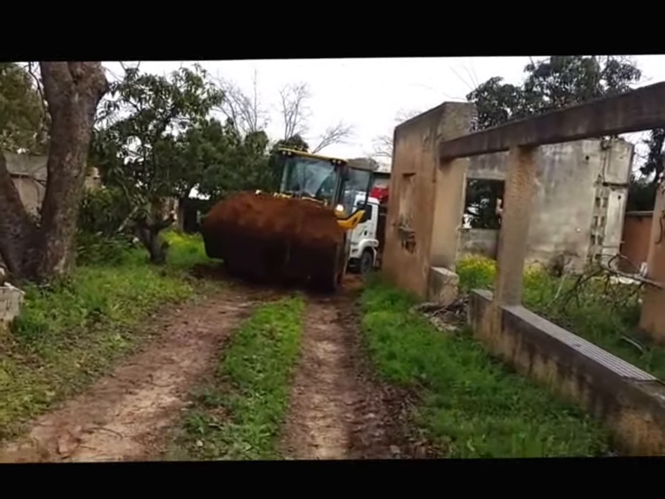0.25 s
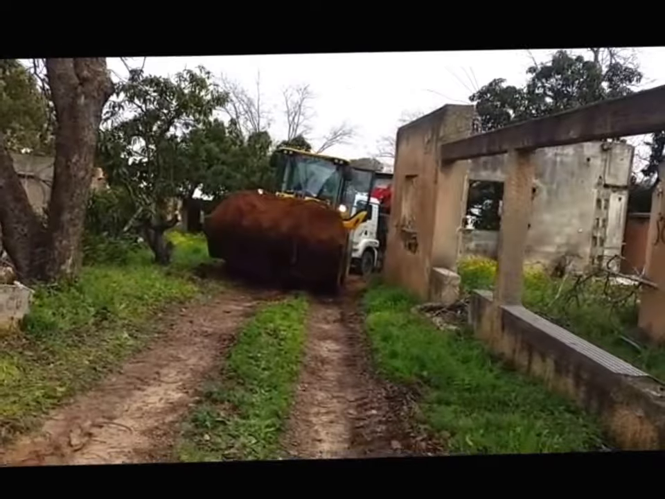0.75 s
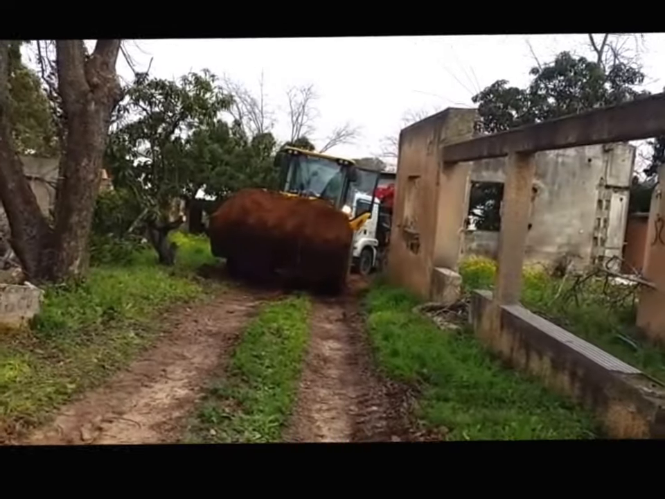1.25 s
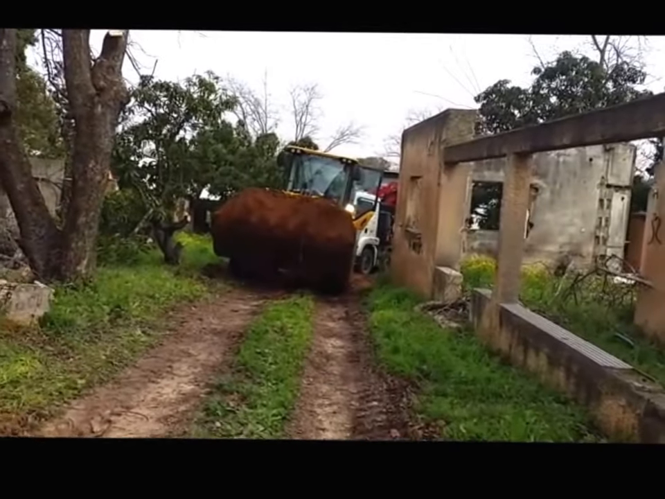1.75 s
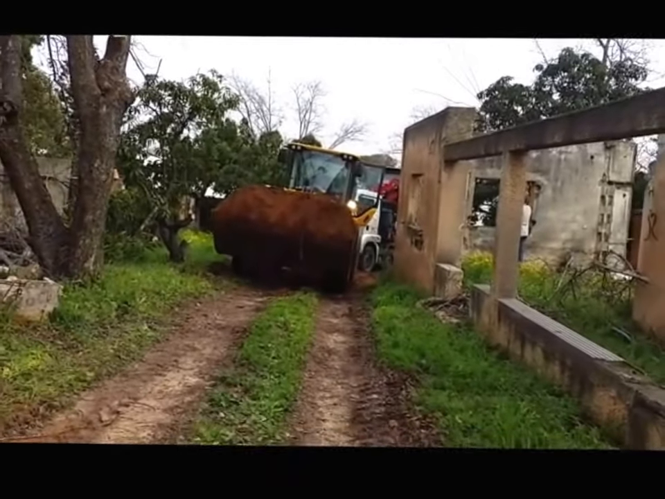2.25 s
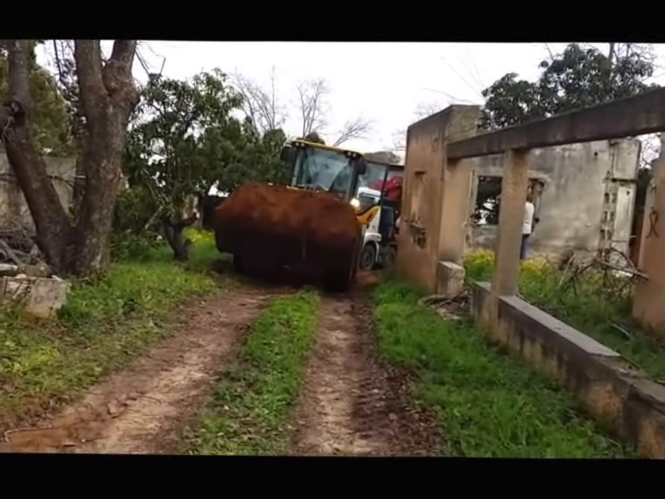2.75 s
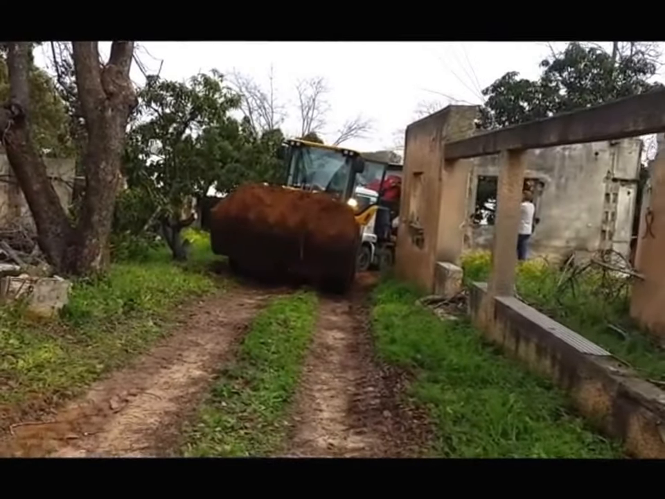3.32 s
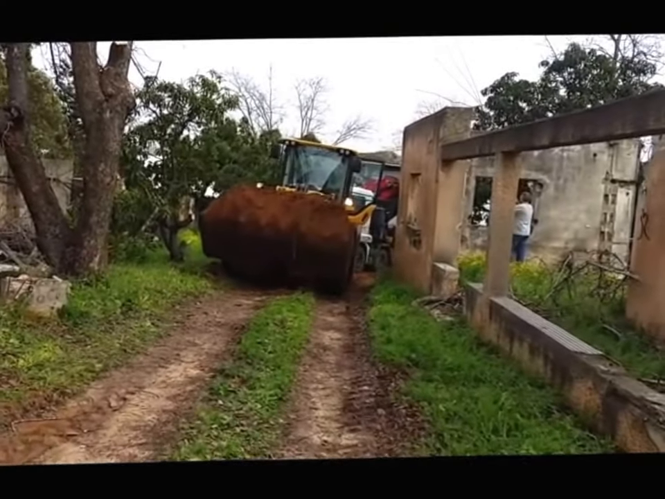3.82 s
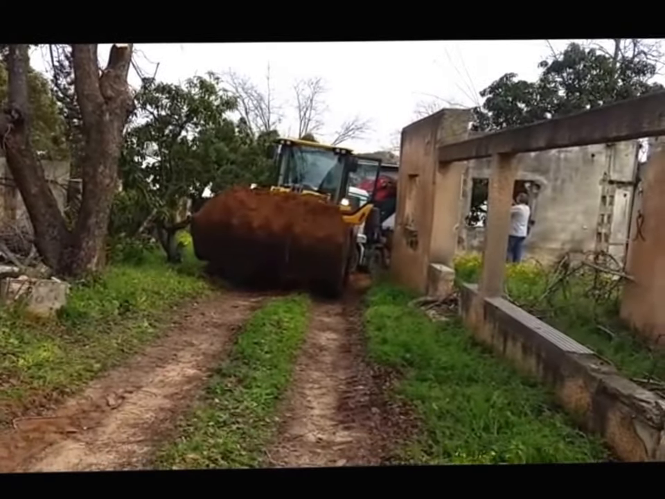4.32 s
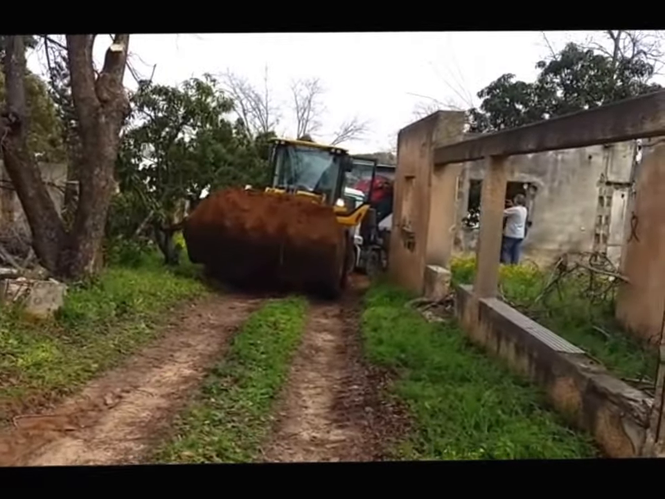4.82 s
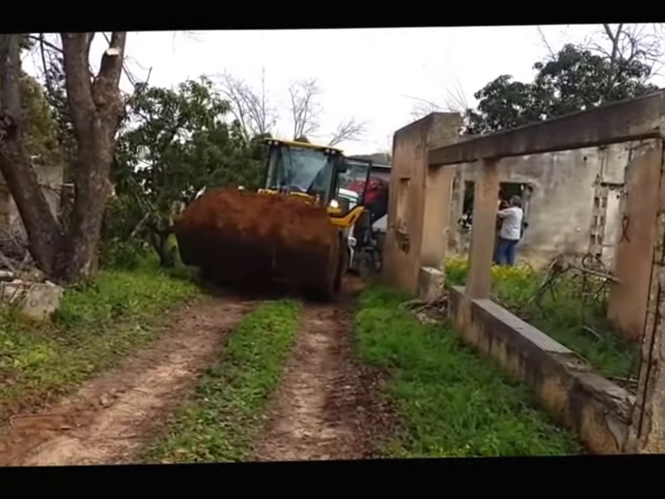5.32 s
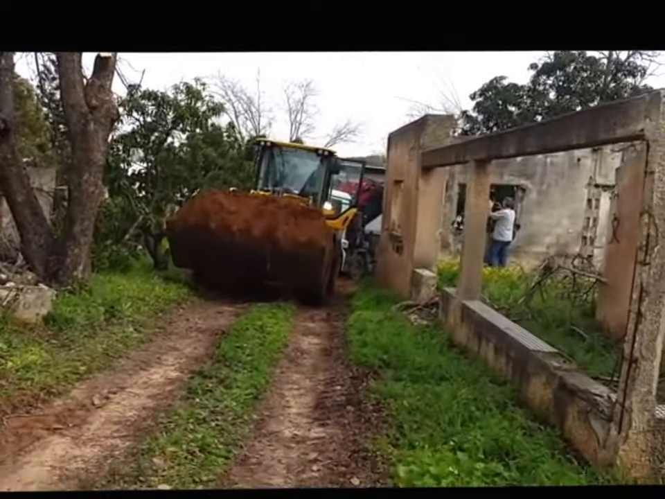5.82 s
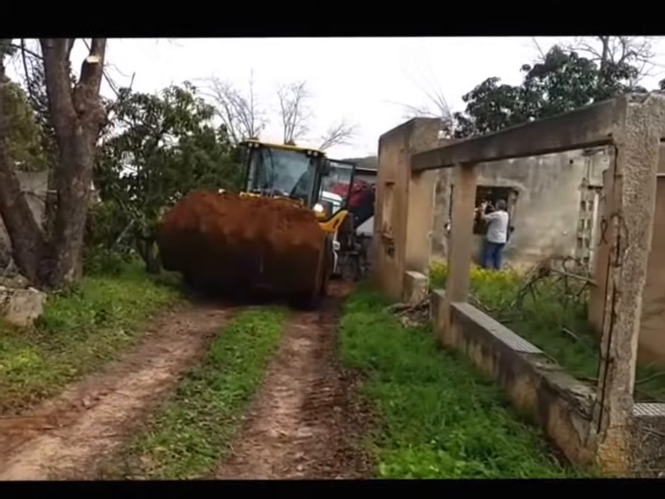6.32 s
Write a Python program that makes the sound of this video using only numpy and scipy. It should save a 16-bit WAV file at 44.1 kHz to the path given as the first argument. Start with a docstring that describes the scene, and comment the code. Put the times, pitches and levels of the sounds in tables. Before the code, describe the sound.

A diesel wheel loader crawls along a dirt track toward a handheld microphone, its exhaust droning and its engine roar throbbing steadily louder. A hydraulic pump and gears whine in swells, while a second, slower engine rises and falls low behind it. Near the end the loader revs up and a high hiss of cooling air grows. Close by, grass rustles faintly underfoot and a few stems snap.

```python
"""A dirt track through grass, on a handheld two-port microphone. A six-cylinder diesel loader crawls in
from about 32 m to 11 m and revs up near the end: its exhaust drones, its hydraulic pump and gears sing,
and its firings throb in the roar and ring the bonnet panels. Behind it a second, slower engine hunts
up and down. Close to the microphone, grass rustles underfoot and a few stems snap."""
import sys
import numpy as np
from scipy import signal
from scipy.fft import rfft, irfft
from scipy.io import wavfile
from scipy.ndimage import uniform_filter1d

SR = 44100
rng = np.random.default_rng(int(sys.argv[2]) if len(sys.argv) > 2 else 0)


def wav_record(signal):
    """Record a signal, one row per channel, as 16-bit PCM in the file named by sys.argv[1]."""
    frames = np.transpose(np.atleast_2d(signal))
    bounded = np.clip(frames, -1, 1)
    # unit amplitude maps onto the largest positive 16-bit level
    quanta = np.round(bounded * 32767).astype(np.int16)
    wavfile.write(sys.argv[1], SR, quanta)


N = 289296
MIDDLE_M = 16  # reference distance of the loader


def loader():
    """The machine on the track; its roar and weaker tones grow as it nears and as it revs."""
    # engine speed: t/s, cycle f/Hz (six firings a cycle)
    speed = [(0, 15.24), (1.45, 15.17), (1.8, 14.97), (2.5, 14.8), (4.3, 14.72), (4.55, 14.84),
             (5.22, 15.82), (5.5, 16.57), (6, 16.48), (6.55, 16.19)]
    idle_hz, throttle_db_per_hz = 14.59, 1.07
    hz = over_time(speed)[0]
    cycles = np.cumsum(hz) / SR
    gain_db = 20 * np.log10(MIDDLE_M / metres()) + throttle_db_per_hz * (hz - idle_hz)
    return (cooling_air() + exhaust(cycles, gain_db) + pump(cycles) + gears(cycles, gain_db)
            + turbo() + amp(gain_db) * roar(cycles) + panels(cycles))


def exhaust(cycles, gain_db):
    """Orders of the engine cycle start as one suction pulse; the pipe spreads them a little in time."""
    # strong orders at the microphone, swelling and fading: {order: (t/s, level/dB)}
    strong_orders = {6: [(0, -35), (.3, -34), (1.7, -34.5), (2.2, -37), (3.6, -35), (4.3, -29), (4.75, -24),
                     (5, -33.5), (5.5, -28), (6, -22), (6.55, -25)], 9: [(0, -28.5), (.3, -32),
                     (1.5, -31.5), (1.8, -43), (2.25, -42), (2.7, -31.5), (3, -39), (3.5, -30.5),
                     (4.5, -26), (4.75, -37), (5, -27), (5.28, -28), (5.5, -37), (5.75, -31), (6.1, -41),
                     (6.55, -56)], 10: [(0, -50), (1.3, -41), (2.45, -50), (2.75, -44), (3.1, -37.5),
                     (3.75, -39), (4, -49), (4.75, -38), (5.25, -39.5), (5.6, -31), (6.3, -31.5),
                     (6.55, -39.5)], 12: [(0, -41.5), (1.6, -38.5), (3.75, -33.5), (4, -40.5), (4.4, -35.5),
                     (5, -41), (5.25, -31), (5.5, -40.5), (6.55, -39)]}
    # weak orders from unequal cylinders: order, level/dB before the swell
    weak_orders = [(7, -45), (8, -48), (11, -49), (13, -51), (14, -49), (15, -53), (16, -57), (17, -62),
                   (18, -56), (19, -62), (20, -64), (21, -67), (22, -66), (24, -66), (26, -64), (36, -57),
                   (40, -60), (41, -56), (42, -63), (45, -62)]

    def start_turn(order):
        return .5 - .01 * (order - 9) ** 2
    strong_db = {order: over_time(curve)[0] for order, curve in strong_orders.items()}
    out = sum(tone(cycles, order, db, waver_db=.5, slip=.1, start=start_turn(order))
              for order, db in strong_db.items())
    # orders 8 and 14 come from crank unbalance and swell with order 10
    crank_db = .7 * (strong_db[10] + 43)
    for order, db in weak_orders:
        swell_db = crank_db if order in (8, 14) else gain_db
        start = start_turn(order) + .3 * rng.standard_normal()
        out += tone(cycles, order, db + swell_db, waver_db=1.4, slip=.5, start=start)
    return out


def roar(cycles):
    """Combustion roar at the middle distance, throbbing with each firing and each cycle."""
    # spectrum of the roar: f/Hz, relative level/dB
    colour = [(15, -30), (30, -16), (50, -15), (85, -8), (170, -7), (230, -14), (321, -23), (438, -27),
              (543, -16), (875, -28), (1280, -27), (1480, -31), (2270, -32), (2690, -39), (4650, -43),
              (6050, -60), (7500, -72), (9750, -102)]
    # valves and injectors clatter alike in every cycle; the rest never repeats
    steps = 3000
    clatter = rng.standard_normal((2, steps))[:, (cycles * steps).astype(int) % steps]
    angle = 2 * np.pi * cycles
    throb = amp(.18 * np.cos(6 * angle) + .23 * np.cos(angle) + .46 * walk(6.01))
    noise = rng.standard_normal((2, N)) + .31 * clatter
    return amp(-48.5) * at_ports(throb * noise, colour, lo_hz=848, hi_hz=5000)


def pump(cycles):
    """The hydraulic pump turns with the engine and sings louder while the hydraulics work."""
    # pump tone at the microphone: t/s, level/dB
    level = [(0, -53), (.72, -57.5), (1.0, -42.5), (1.2, -38.5), (1.5, -39), (1.8, -42), (2.2, -48.5),
             (2.7, -61), (3.08, -53), (3.25, -42.5), (3.4, -39.5), (3.6, -44.5), (4.08, -41), (4.4, -43.5),
             (4.6, -49.5), (4.75, -43), (4.95, -58), (5.08, -58), (5.27, -42), (5.38, -40), (5.55, -56),
             (5.82, -55), (6.1, -43), (6.4, -39.5), (6.55, -37.5)]
    return tone(cycles, order=35.47, db=over_time(level)[0], waver_db=.6, slip=.1)


def gears(cycles, gain_db):
    """A fast mesh rasps under load, others whine by turns, and one geared shaft hums throughout."""
    # rasp at the microphone: t/s, level/dB
    rasp = [(0, -71), (4.3, -67), (4.75, -60), (5.1, -60), (5.35, -55.5), (5.55, -60), (5.8, -53),
            (6.0, -62), (6.3, -57), (6.55, -59)]
    # gear whines: order of the engine cycle, start t/s, end t/s, level/dB
    whines = [(53, 0.26, 1.82, -56.5), (38.3, 1.85, 2.4, -50), (38.08, 2.7, 4.5, -55),
              (87.9, 1.6, 1.96, -55.5), (88, 2.28, 3.6, -58), (70.6, 0.38, 2.4, -65.5),
              (70.3, 2.9, 4.33, -57), (52.9, 2.9, 4.2, -57), (84.5, .2, 1.2, -63.5), (47.1, 2.9, 4.3, -54),
              (47.1, 4.4, 5.2, -50), (41.3, 4.55, 4.8, -52), (31.65, 5.1, 5.53, -49.5),
              (46.5, 5.7, 7.1, -53.5)]
    rasp_backlash, whine_backlash = .0012, .001  # in engine cycles
    rasp_db = over_time(rasp)[0] + 2.5 * walk(25)
    out = tone(cycles + rasp_backlash * walk(60), order=138.3, db=rasp_db, waver_db=1, slip=1)
    for order, start, end, db in whines:
        whine = tone(cycles + whine_backlash * walk(30), order, db, waver_db=1.5, slip=.45)
        out += held(start, end, rise_s=.24, fall_s=.24) * whine
    return out + tone(cycles, order=17.73, db=gain_db - 53.5, waver_db=2.5, slip=.5)


def panels(cycles):
    """Each firing shakes the bonnet panels, which ring in narrow bands that swell and fade."""
    # panel resonances: f/Hz, width/Hz, level/dB at the middle distance, loss with distance/(dB/m)
    resonances = [(1078, 32, -64, 0), (1275, 47, -64.5, -0.5), (1184, 100, -63.5, -0.4),
                  (2313, 200, -61, 0), (1577, 63, -69, .5), (3810, 560, -67, 0.23)]
    shake = amp(3 * (np.cos(2 * np.pi * 6 * cycles) + walk(20) / 2))
    out = 0
    for hz, width, db, loss in resonances:
        ring = [(20, -90), (hz - 2 * width, -30), (hz - width / 2, -3), (hz, 0),
                (hz + width / 2, -3), (hz + 2 * width, -30), (20000, -90)]
        swell = amp(db - loss * (metres() - MIDDLE_M) + 1.3 * walk(4))
        out += swell * at_ports(shake * rng.standard_normal((2, N)), ring, lo_hz=20, hi_hz=20000)
    return out


def cooling_air():
    """The loader's cooling air, a high hiss that grows as it comes closer."""
    # spectrum of the hiss: f/Hz, relative level/dB
    colour = [(3060, -31), (5200, -24), (5790, -16), (7680, -17.5), (9170, -3.5), (10800, -6), (15800, 1.5)]
    # top band of the hiss at the microphone: t/s, level/dB
    level = [(0, -67.5), (.5, -65), (1.2, -64.5), (1.6, -64), (1.9, -63.5), (2.5, -63), (2.9, -61.5),
             (3.3, -62.5), (3.9, -62), (4.3, -60), (4.6, -57), (5.2, -56), (5.6, -54), (6, -54),
             (6.55, -53)]
    swell = amp(over_time(level)[0] + .55 * walk(6))
    return swell * at_ports(rng.standard_normal((2, N)), colour, lo_hz=8950, hi_hz=16200)


def turbo():
    """A faint whistle; the turbo runs free of the crank, so its pitch trembles."""
    # turbo whistle: t/s, f/Hz, level/dB
    whistle = [(0, 14650, -80), (1.5, 14600, -78), (2.5, 14150, -78), (3, 14000, -76), (3.9, 14000, -72),
               (4.5, 14000, -73), (5.1, 15800, -73), (5.3, 16600, -72)]
    hz, db = over_time(whistle)
    cycles = np.cumsum(hz + 25 * walk(60)) / SR
    return tone(cycles, 1, db, waver_db=2.5, slip=0)


def second_engine():
    """From behind the loader come only a low throb and its octave, which opens up at speed."""
    # hunting throb: t/s, firing f/Hz, level/dB
    hunting = [(0, 30.4, -45), (.75, 33, -40), (1.3, 32.7, -39), (1.75, 31.1, -41), (2.05, 29.2, -43),
               (2.5, 28.9, -40.5), (3, 32.9, -37), (3.4, 35.2, -36), (3.85, 35.6, -35), (4.2, 34, -35.5),
               (4.55, 30, -41.5), (5, 28.4, -39.5), (5.25, 32.5, -36), (5.75, 34.1, -30), (6, 33.3, -31.5),
               (6.55, 33.9, -31)]
    mean_hz, octave_db_per_hz = 32, .56
    hz, db = uniform_filter1d(over_time(hunting), size=8000)
    firings = np.cumsum(hz) / SR
    octave_db = db - 3.5 + octave_db_per_hz * (hz - mean_hz)
    throb = tone(firings, 1, db, waver_db=1, slip=.15)
    return throb + tone(firings, 2, octave_db, waver_db=1.5, slip=.3)


def grass():
    """Underfoot by the microphone, blades brush in a grainy hiss at each step; a few stems snap."""
    # brushes through the grass: start t/s, length/s, level/dB
    brushes = [(.295, 0.092, -69), (0.638, 0.18, -62.5), (5.545, 0.018, -56.5), (5.58, 0.014, -46),
               (5.633, 0.012, -46.5), (5.658, .01, -52), (5.7, .02, -61), (5.745, 0.05, -49.5),
               (5.827, 0.041, -44.5), (5.92, .06, -63)]
    # snapping stems: t/s, peak level/dB
    snaps = [(0.3044, -61), (0.3174, -58), (0.6694, -55), (0.7094, -62), (2.9272, -56), (3.711, -61),
             (4.4294, -52), (5.219, -49), (5.7414, -48), (6.2327, -53), (6.375, -42.5)]
    # spectrum of the rustle: f/Hz, relative level/dB
    colour = [(1200, -31), (2300, -6.5), (4000, -14), (6300, -21.5), (7800, -22), (8800, -11),
              (15100, -5.5), (15800, -1.5)]
    brushing = sum(amp(db) * held(t, t + length, rise_s=.016, fall_s=.026) for t, length, db in brushes)
    snapping = sum(amp(db) * held(t, t, rise_s=.0005, fall_s=.004) for t, db in snaps)
    envelope = brushing * amp(1.6 * walk(300)) + snapping
    grains = envelope * rng.standard_normal((2, N))
    return np.sqrt(np.mean(envelope ** 2)) * at_ports(grains, colour, lo_hz=9000, hi_hz=16300)


def metres():
    """Distance from the loader to the microphone, one value a sample."""
    # approach along the track: t/s, distance/m
    approach = [(0, 32.5), (1.3, 23), (3, 17), (4.5, 13.7), (6.56, 11.3)]
    return over_time(approach)[0]


def ports(hz):
    """Correlation of the microphone's two ports at hz, and the tilt: left gain, inverse of the right."""
    # stereo image: f/Hz, correlation, left minus right level/dB
    image = [(60, 0.95, -0.2), (127.5, 1, 0), (400, 0.81, 2), (565, 0.83, 4), (1140, 0.2, 1.5),
             (1400, -0.29, 3), (1820, 0.07, 2.8), (2360, 0.51, 2), (3500, -0.24, 10), (4500, 0.55, 4.5),
             (6500, 0.78, 0), (7500, 0.09, 7), (8500, -0.06, 15.5), (10500, 0.09, 14.5), (12500, 0.57, 1.5),
             (15000, 0.83, 1)]
    correlation = over_hz([(f, c) for f, c, _ in image], hz)
    balance_db = over_hz([(f, db) for f, _, db in image], hz)
    return np.clip(correlation, -.95, 1), amp(balance_db / 2)


def at_ports(noises, colour, lo_hz, hi_hz):
    """Colours two noises and spreads them over the ports; their mean has rms 1 from lo_hz to hi_hz."""
    hz = np.fft.rfftfreq(N, 1 / SR)
    correlation, tilt = ports(hz)
    left, independent = rfft(noises)
    right = correlation * left + np.sqrt(1 - correlation ** 2) * independent
    pair = np.array([tilt * left, right / tilt])
    pair *= amp(over_hz(colour, hz)) / np.sqrt(tilt ** 2 + tilt ** -2 + 2 * correlation)
    band = pair.mean(axis=0)[(hz > lo_hz) & (hz < hi_hz)]
    return irfft(pair, N) * N / np.sqrt(2 * np.sum(np.abs(band) ** 2))


def tone(cycles, order, db, waver_db, slip, start=None):
    """One order of a turning shaft, wavering in level and phase; slip in radians, start in turns."""
    mean_hz = order * cycles[-1] * SR / N
    correlation, tilt = ports(mean_hz)
    apart = np.arccos(correlation) / 2  # the delay between the two ports shifts the phase between them
    turn = rng.random() if start is None else start
    phase = 2 * np.pi * (order * cycles + turn) + slip * walk(5)
    size = np.sqrt(2) * amp(db + waver_db * walk(4.047))
    return size * np.array([tilt * np.cos(phase + apart), np.cos(phase - apart) / tilt])


def amp(db):
    """Gain of a level in dB."""
    return np.exp(np.asarray(db) * np.log(10) / 20)


def over_hz(table, hz):
    """Reads (f/Hz, value) points on a log-frequency axis."""
    f, values = np.transpose(table)
    return np.interp(np.log(np.maximum(hz, 1)), np.log(f), values)


def over_time(table):
    """Value columns of (t/s, value, ..) rows, one value a sample."""
    t, *columns = np.transpose(table)
    return [np.interp(np.arange(N) / SR, t, column) for column in columns]


def walk(rate):
    """Smooth drift: random levels held 1 / rate s and slewed twice."""
    hold = int(SR / rate)
    steps = np.repeat(rng.standard_normal(N // hold + 1), hold)
    return 2.07 * uniform_filter1d(uniform_filter1d(steps, hold), hold)[:N]


def held(start, end, rise_s, fall_s):
    """Gain 1 from start to end, dying away exponentially before and after."""
    t = np.arange(N) / SR
    return np.exp(np.minimum(t - start, 0) / rise_s - np.maximum(t - end, 0) / fall_s)


def scene():
    """The loader on the track, the second engine behind it and the grass close by."""
    return loader() + second_engine() + grass()


def record(dry):
    """The sound fades in over 7 ms; the recorder cuts the top above 15.8 kHz."""
    fade_in = np.sin(np.pi / 2 * np.minimum(np.arange(N) / 300, 1)) ** 2
    lowpass = signal.ellip(14, .3, 75, 15790, fs=SR, output="sos")
    return signal.sosfilt(lowpass, dry * fade_in)


dry = scene()
out = record(dry)
wav_record(out)
```